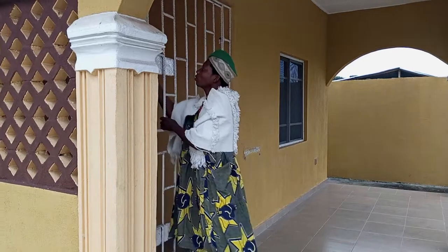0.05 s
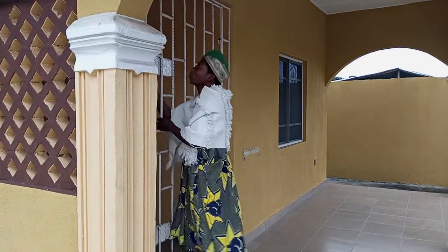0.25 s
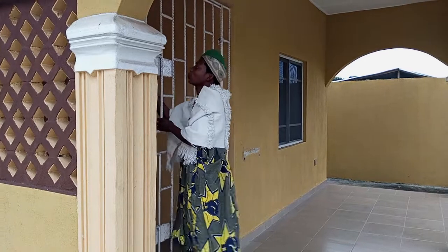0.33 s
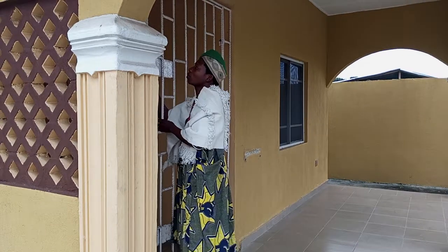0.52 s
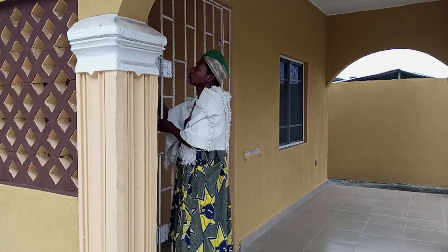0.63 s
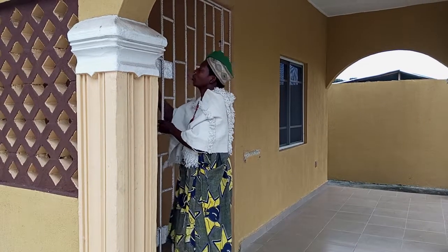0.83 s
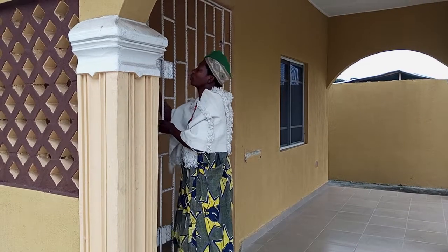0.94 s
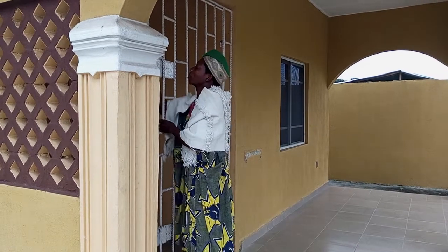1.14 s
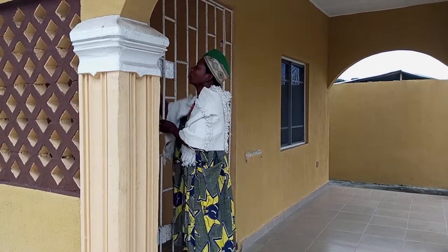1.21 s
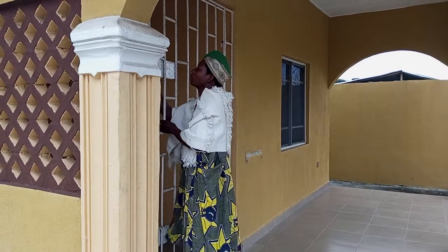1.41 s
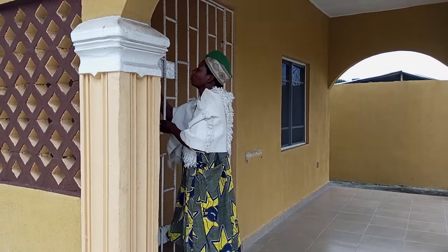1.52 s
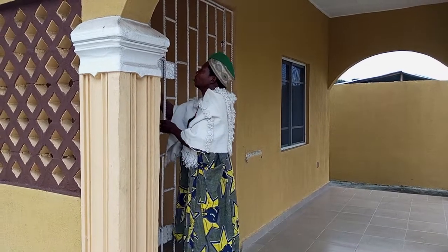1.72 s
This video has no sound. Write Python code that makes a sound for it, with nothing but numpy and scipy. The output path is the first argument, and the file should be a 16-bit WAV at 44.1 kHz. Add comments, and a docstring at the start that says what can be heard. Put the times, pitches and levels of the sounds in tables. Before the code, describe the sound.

A steel security gate is shaken and clanks in a rapid bright burst, drags briefly, ticks and knocks dully, then a bolt clanks home; hard-walled tiled porch, quiet air, one microphone.

```python
"""Loose bars clank as a steel security grille on a tiled porch is shaken and slammed; lattice and frame boom along.
Then it ticks, is knocked dully, and a bolt scrapes home into a last clank; quiet outdoor air lies behind.
Struck steel is a sum of decaying modes plus a chattering noise crack; drag, scrape and air are coloured noise.
The hard walls answer blows, clicks, knocks and drag a moment later. One microphone, with a noise suppressor."""
import sys
import numpy as np
from scipy import signal
from scipy.fft import rfft, irfft
from scipy.io import wavfile
from scipy.ndimage import uniform_filter1d, map_coordinates

SR = 44100
rng = np.random.default_rng(int(sys.argv[2]) if len(sys.argv) > 2 else 0)


def to_linear_factor(level_db):
    """Convert decibel levels (scalar or array-like) to linear amplitude factors."""
    exponent = np.asarray(level_db, float) / 20
    return 10 ** exponent


def dump_mix(stems):
    """Bounce the given channels to the path in sys.argv[1] as a 16-bit WAV at rate SR."""
    frames = np.atleast_2d(stems).T  # one column per channel
    limited = np.clip(frames, -1, 1)  # hard clip at full scale
    pcm = np.round(limited * 32767).astype(np.int16)
    wavfile.write(sys.argv[1], SR, pcm)


N = 77175  # length in samples

# Blows on the grille. Each row: start in seconds, direct level in dB of the thin bars, the lattice,
# the frame and the door leaf, rise time in seconds.
BLOW_ROWS = [(.011, -56.5, -44.5, -48, -57, 0.0056), (.032, -47.5, -68, -34, -47, 0.00039),
             (.092, -51.5, -34.5, -38.5, -43.5, 0.00067), (.1447, -27, -32.5, -34.5, -43, 0.00057),
             (.165, -34.5, -39, -54, -63, 0.0013), (.175, -22, -32, -30.5, -65, 0.0016),
             (.191, -52, -31, -65, -68, 0.00074), (.196, -18.5, -52, -31.5, -65, 0.00076),
             (.222, -28, -34.5, -34.5, -42.5, 0.021), (.438, -35, -32, -43.5, -53, 0.0071),
             (.632, -48, -43, -43, -57, .008), (.677, -62, -41.5, -42, -64, 0.0016),
             (.700, -79, -64, -53, -80, .004), (.830, -51, -68, -54.5, -70, 0.00058),
             (.858, -92.5, -51, -60.5, -73, 0.0026), (1.002, -93, -63, -63, -77, 0.0029),
             (1.3818, -25, -31, -33.5, -46.5, 0.00085), (1.408, -33, -29.5, -31, -42, 0.0012),
             (1.628, -72, -58.5, -81, -80, 0.012)]
# Ringing of each part. Each row: mode in Hz, nominal level in dB, t60 in seconds.
# Colour of its crack. Each row: frequency in Hz, relative level in dB.
# Thin bars:
BAR_RING = [(3942, -8.5, 0.031), (4085, -1, 0.12), (5020, 4.5, 0.013), (4900, -5.5, 0.12), (6210, 12, 0.09),
            (6830, 4, 0.024), (7330, 11, .04), (9770, -3, .03), (9300, -10.5, 0.036)]
BAR_COLOUR = [(1530, -30), (2600, -12.5), (3420, 1), (3950, 0.5), (4460, 1), (7310, -2), (9840, -3.5),
              (13500, -21), (15100, -10.5), (16000, -42)]
# Lattice, same columns:
LATTICE_RING = [(1279, -1.5, 0.049), (1458, -5.5, .1), (1513, 0.5, 0.42), (1629, 4, 0.45),
                (1904, -14.5, 0.1314), (1920, 0, .14), (2005, 4, 0.14), (2216, 2.5, 0.15),
                (2273, 6.5, 0.18), (2518, 6.5, 0.2), (2758, 1, 0.11)]
LATTICE_COLOUR = [(530, -31), (900, -16.5), (1420, 3.5), (1760, 6.5), (2430, 5.5), (3500, -36), (4550, -34),
                  (7700, -120)]
# Frame, same columns:
FRAME_RING = [(605, -14.5, 0.18), (673, -1, 0.24), (695, -14.5, .06), (769, 20, 0.04), (851.5, 10, 0.067),
              (912, 5, .06), (960, 8.5, 0.18)]
FRAME_COLOUR = [(250, -27), (420, -24.5), (668, 12), (921, -14), (1300, 3), (1690, -29), (2860, -120)]
# Whole door leaf, same columns:
LEAF_RING = [(85, -24, .15), (149, -3, .2), (192, -0.5, .15), (286, 3, .15), (320, -5, 0.095)]
LEAF_COLOUR = [(29, -45.5), (50, -36), (151, -16), (264, -1.5), (306, -8.5), (450, -7), (580, -16),
               (990, -120)]


def blows():
    """Blows ring the whole grille: bars, lattice, frame and leaf, each by its own amount."""
    bars = (BAR_RING, BAR_COLOUR, 0)
    lattice = (LATTICE_RING, LATTICE_COLOUR, 1)
    frame = (FRAME_RING, FRAME_COLOUR, 2)
    leaf = (LEAF_RING, LEAF_COLOUR, 3)
    return strike(BLOW_ROWS, [bars, lattice, frame, leaf], WALL_DB[0])


# Latch clicks. Each row: start in seconds, direct level in dB of latch and jingle, rise time in seconds.
CLICK_ROWS = [(.677, -47.5, -56.5, 0.0016), (.8305, -38.5, -40.5, 0.0017), (1.3818, -25, -39, 0.00033),
              (1.387, -23, -33.5, 0.001)]
# Latch. Each row: mode in Hz, nominal level in dB, t60 in seconds; then crack colour in Hz, dB.
LATCH_RING = [(3640, -0.5, 0.23), (3756, 1.5, 0.12), (5130, -12, 0.079), (5210, 8, 0.19), (5120, -3, 0.17),
              (5700, 9.5, .1), (5520, 5, 0.099), (6450, -25, 0.089), (6800, -1, 0.11), (7280, -1.5, 0.151),
              (9220, 2, 0.073), (10100, 1, 0.041), (12600, -12, .1)]
LATCH_COLOUR = [(1760, -61), (3000, -36), (3730, -8.5), (4350, -27), (5670, 3), (6350, -18), (7200, 6),
                (8110, -18.5), (9460, -7.5), (16000, -25.5)]


def clicks():
    """Clicks ring the latch and a small jingling part."""
    latch = (LATCH_RING, LATCH_COLOUR, 4)
    jingle = (JINGLE_RING, JINGLE_COLOUR, 5)
    return strike(CLICK_ROWS, [latch, jingle], WALL_DB[1])


# Dull knocks. Each row: start in seconds, direct level in dB of jingle and knock, rise time in seconds.
KNOCK_ROWS = [(1.207, -46.5, -44.5, 0.0043), (1.232, -57, -41.5, 0.0034), (1.266, -88, -48, 0.0071)]
# Small jingle, played by the clicks too. Each row: mode in Hz, nominal level in dB, t60 in seconds;
# then crack colour in Hz, dB.
JINGLE_RING = [(4700, -5.5, 0.064), (5800, -5, 0.046), (7100, -6, .04), (7500, 3, 0.12), (8300, -16, 0.04),
               (8800, 2.5, 0.13), (8900, -2, 0.074), (11100, -17, 0.059)]
JINGLE_COLOUR = [(2350, -36), (4000, -21), (6510, -10.5), (7310, -13), (9330, 0), (12600, -22.5),
                 (16000, -29.5)]
# Knocked frame, same columns:
KNOCK_RING = [(154.4, -4, 0.36), (281, 5, 0.3), (297, 4.5, 0.22), (594, -4.5, 0.11), (703, -2, .1),
              (830, -24, 0.062), (907, 8, 0.25), (1168, -4.5, 0.095), (1520, -17, .08), (2500, -9.5, 0.13)]
KNOCK_COLOUR = [(35, -62.5), (60, -23), (292, -10), (797, -2.5), (882, -4), (994, -7), (3500, -26),
                (4550, -79), (7700, -120)]


def knocks():
    """Knocks ring low modes of the frame and something small that jingles."""
    jingle = (JINGLE_RING, JINGLE_COLOUR, 5)
    knock = (KNOCK_RING, KNOCK_COLOUR, 6)
    return strike(KNOCK_ROWS, [jingle, knock], WALL_DB[2])


def strike(rows, parts, wall_db):
    """Each row rings the given parts, each at its own level, and the porch answers."""
    out = np.zeros(N + 2 * SR)
    for start_s, *levels_db, rise_s in rows:
        direct = sum(to_linear_factor(db) * clang(rise_s, *part) for db, part in zip(levels_db, parts))
        sound = porch(direct, wall_db)
        out[round(start_s * SR):][:len(sound)] += sound
    return out[:N]


# One value for each steel part, in the order bars, lattice, frame, leaf, latch, jingle, knock.
# Energy of the crack over that of the modes, in dB:
CRACK_OVER_RING_DB = [5.5, 6, 2, -1, -4, 3, -1]
# Decay of the crack, t60 in seconds:
CRACK_DECAY_S = [0.06, 0.1, 0.066, 0.28, 0.032, .03, 0.26]
# Detuning of near-equal pieces, as a share of the frequency:
DETUNING = [.015, .006, 0.012, 0.019, 0.00884, 0.0127, 0.0053]
HOLD_S, HOLD_RISES = 0.0017, 1.414  # contact after the rise: seconds, plus this many rise times
MODE_SCATTER_DB, CHATTER_DB = 1.5, 3


def clang(rise_s, modes, colour, part):
    """A contact rings the modes of three near-equal pieces and a chattering crack; both decay after the hold."""
    t = np.arange(SR // 2) / SR
    rise_s = max(rise_s, 1 / SR)
    hold_s = rise_s * (1 + HOLD_RISES) + HOLD_S
    after = np.maximum(t - hold_s, 0)

    hz, db, t60 = np.transpose(modes * 3)[:, :, None]
    piece = np.repeat([-1, 0, 1], len(modes))[:, None]
    level_luck, pitch_luck, phase = rng.standard_normal((3, len(hz), 1))
    level = to_linear_factor(db + MODE_SCATTER_DB * level_luck - 60 * after / t60)
    tuned_hz = hz * (1 + DETUNING[part] * (piece + pitch_luck / 3))
    ring = (level * np.sin(2 * np.pi * (tuned_hz * t + phase))).sum(0)

    # the chatter has 990 random points a second
    chatter = to_linear_factor(CHATTER_DB * map_coordinates(rng.standard_normal(500), [t * 990]))
    crack = noise(colour, len(t)) * chatter * to_linear_factor(-60 * after / CRACK_DECAY_S[part])

    ring = ring / np.linalg.norm(ring)
    crack = to_linear_factor(CRACK_OVER_RING_DB[part]) * crack / np.linalg.norm(crack)
    both = np.minimum(t / rise_s, 1) * (ring + crack)
    # as much energy as rms 1 lasting for the rise and hold
    return both / np.linalg.norm(both) * np.sqrt(hold_s * SR)


# Handling of the grille. Each row: time in seconds, level in dB before the trim.
DRAG_PATH = [(0.0, -48), (0.17, -42.5), (0.34, -33.5), (0.41, -36), (0.558, -40), (0.704, -52), (0.8, -88)]
# Each row: frequency in Hz, relative level in dB.
DRAG_SPECTRUM = [(29, -62), (50, -41), (81, -12), (284, -8), (439, -11), (884, -6), (1150, -13.5),
                 (1700, -9), (4450, -13.5), (16000, -56.5)]
DRAG_TRIM_DB, DRAG_GRIT_DB = -3, 3


def drag():
    """The grille drags and jitters while handled: coloured noise whose level wavers as grit."""
    s, db = np.transpose(DRAG_PATH)
    grit = map_coordinates(rng.standard_normal(200), [np.linspace(0, 199, N)])
    path_db = np.interp(np.arange(N) / SR, s, db, right=-120)
    level_db = path_db + DRAG_TRIM_DB + DRAG_GRIT_DB * grit
    return porch(to_linear_factor(level_db) * noise(DRAG_SPECTRUM, N), WALL_DB[3])[:N]


SCRAPE_END_S, SCRAPE_END_DB, SCRAPE_SWELL_DB_PER_S = 1.382, -52.5, 499
SCRAPE_HZ, SCRAPE_WIDTH_HZ = 5900, 350


def scrape():
    """The bolt scrapes: a narrow band of noise that swells until the bolt strikes."""
    left_s = SCRAPE_END_S - np.arange(N) / SR
    shape = [(-2, -60), (-1, -14), (0, 0), (1, -14), (2, -60)]  # widths from the centre, dB
    band = [(SCRAPE_HZ + step * SCRAPE_WIDTH_HZ, db) for step, db in shape]
    level = to_linear_factor(SCRAPE_END_DB - SCRAPE_SWELL_DB_PER_S * np.abs(left_s))
    return (left_s > 0) * level * noise(band, N)


# Decay of the tiled porch. Each row: frequency in Hz, t60 in seconds.
PORCH_DECAY = [(100, 0.7), (500, 0.22), (1500, 0.59), (3000, 0.43), (6000, 0.56), (8500, 0.39),
               (11000, 0.4), (15000, 0.38)]
# Energy of the walls' answer over the direct sound in dB, for blows, clicks, knocks and drag.
WALL_DB = [-2.5, -9.5, -9, -4]
PORCH_DELAY_S, PORCH_BUILD_S = .014, 0.0027


def porch(x, wall_db):
    """The sound and, a little later, the walls' answer, each frequency dying at its own speed."""
    hz, t, z = signal.stft(rng.standard_normal(SR), SR, nperseg=256)
    decay = to_linear_factor(-60 * t / along(PORCH_DECAY, hz)[:, None])
    tail = signal.istft(z * decay, SR, nperseg=256)[1][:SR]
    tail = tail * (1 - np.exp(-np.arange(SR) / SR / PORCH_BUILD_S))
    tail = to_linear_factor(wall_db) * tail / np.linalg.norm(tail)
    response = np.pad(tail, (round(PORCH_DELAY_S * SR), 0))
    response[0] = 1  # direct sound
    return signal.fftconvolve(x, response)


# Outdoor air. Each row: frequency in Hz, relative level in dB.
AIR_COLOUR = [(15, -47), (25, -17.5), (97, -5.5), (200, -0.5), (229, -2.5), (405, -8), (463, -10),
              (641, -4), (936, -4.5), (5280, -9), (16000, -34.5)]


def air():
    """Steady coloured noise of the outdoor air, rms -66 dB."""
    return to_linear_factor(-66) * noise(AIR_COLOUR, N)


def noise(colour, size):
    """White noise shaped in the spectrum by a colour table, scaled to rms 1."""
    gain = to_linear_factor(along(colour, np.fft.rfftfreq(size, 1 / SR)))
    return unit(irfft(rfft(rng.standard_normal(size)) * gain, size))


def along(points, hz):
    """Reads (Hz, value) points at the given frequencies, straight lines on a log frequency axis."""
    f, v = np.transpose(points)
    return np.interp(np.log(hz + 1), np.log(f + 1), v)


def unit(x):
    """Scaled to rms 1."""
    return x / np.sqrt(np.mean(x ** 2) + 1e-20)


def scene():
    """Grille, bolt and outdoor air together at one microphone."""
    return (blows() + clicks() + knocks() + drag() + scrape() + air())[None]


# Power that the suppressor takes for noise. Each row: frequency in Hz, threshold in dB per bin.
NOISE_THRESHOLD = [(300, -100), (2000, -94.5), (5000, -78.5), (9000, -85.5), (14000, -93.5)]
DEEPEST_CUT_DB = -9


def suppress(x):
    """Noise suppressor: turns each band down where its smoothed power is near or below the threshold."""
    hz, _, z = signal.stft(x, SR, nperseg=512)
    power = uniform_filter1d(np.abs(z) ** 2, size=9, axis=1)  # over bins
    power = np.abs(uniform_filter1d(power, size=3, axis=2))  # over frames
    gain = power / (power + to_linear_factor(2 * along(NOISE_THRESHOLD, hz))[:, None])
    return signal.istft(z * np.maximum(gain, to_linear_factor(DEEPEST_CUT_DB)), SR, nperseg=512)[1][:, :N]


def band_limit(x):
    """A steep low-pass at the top of the band."""
    return signal.sosfilt(signal.butter(12, 17000, fs=SR, output="sos"), x)


def record(dry):
    """The microphone loses the deep bass below 69 Hz, then the noise suppressor works."""
    bass_cut = signal.butter(4, 69, "high", fs=SR, output="sos")
    thin = signal.sosfilt(bass_cut, dry)
    return band_limit(suppress(thin))


dry = scene()
out = record(dry)
dump_mix(out)
```